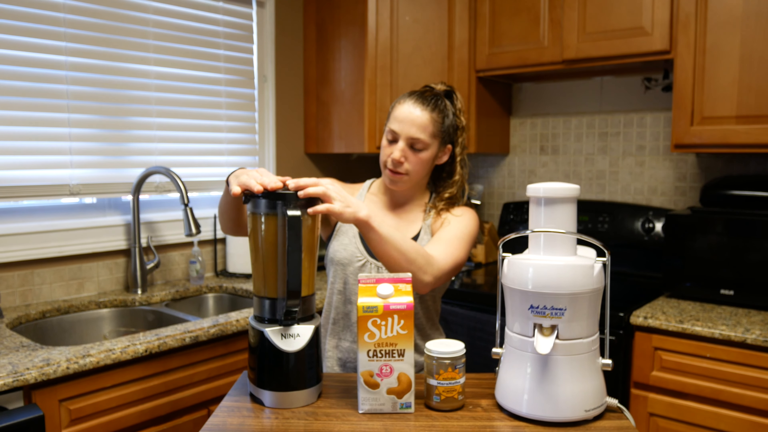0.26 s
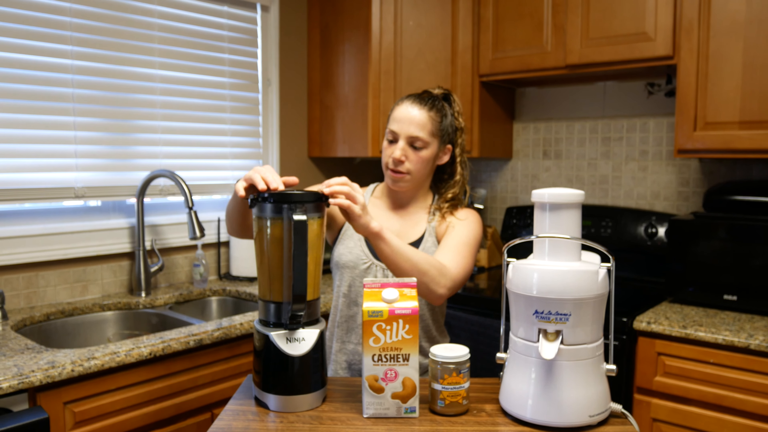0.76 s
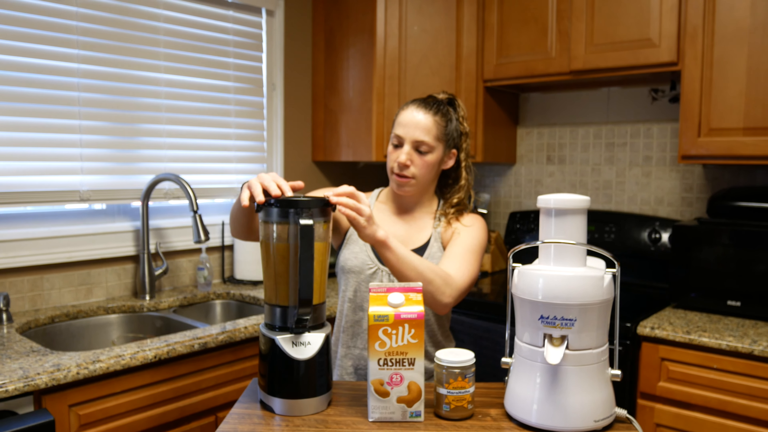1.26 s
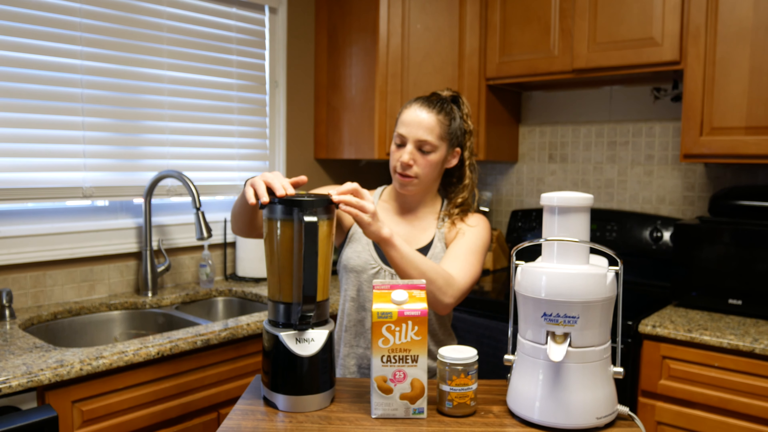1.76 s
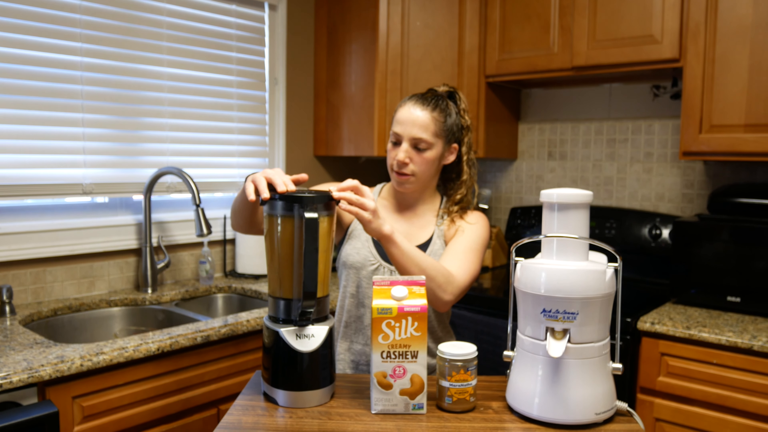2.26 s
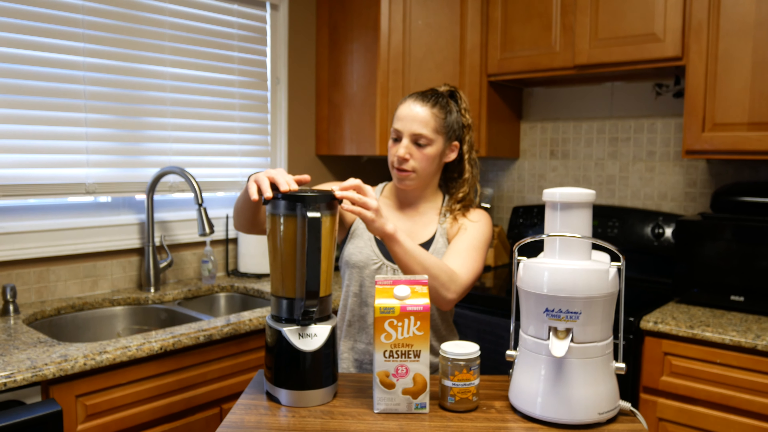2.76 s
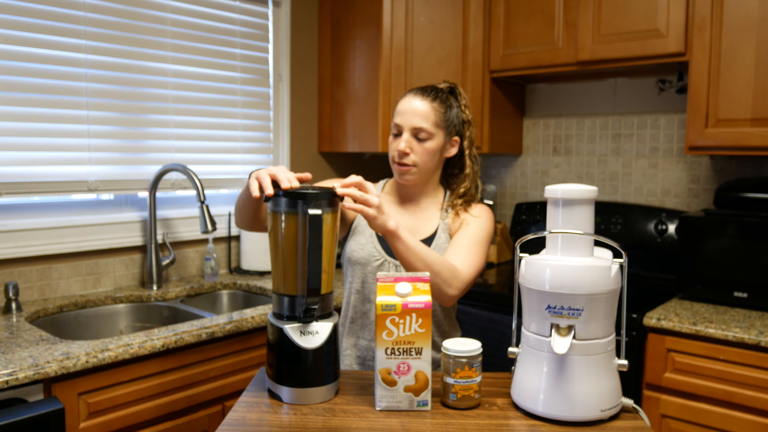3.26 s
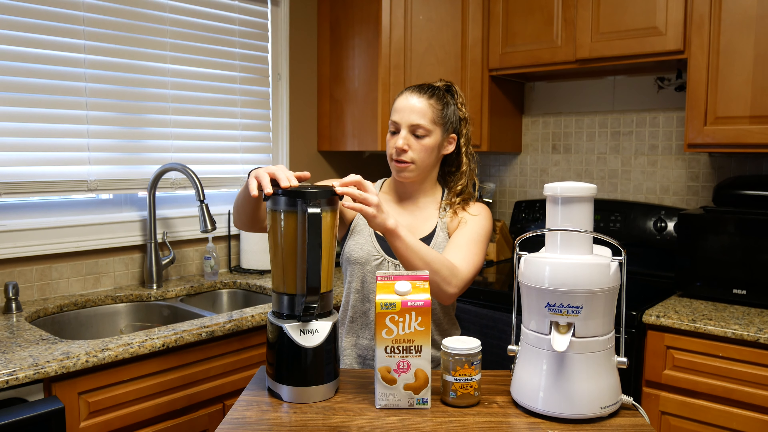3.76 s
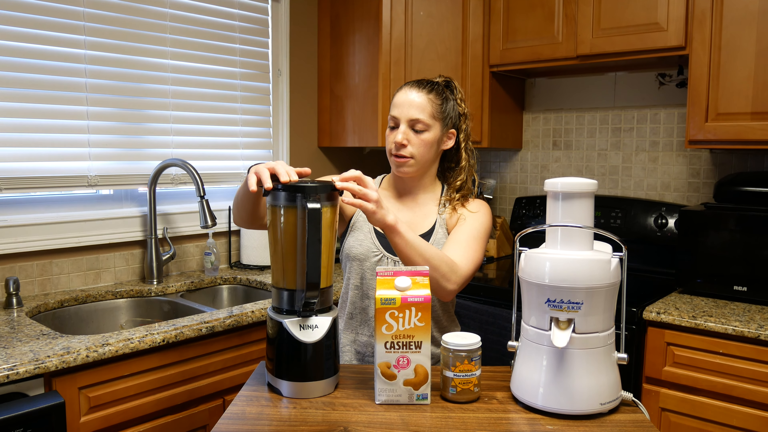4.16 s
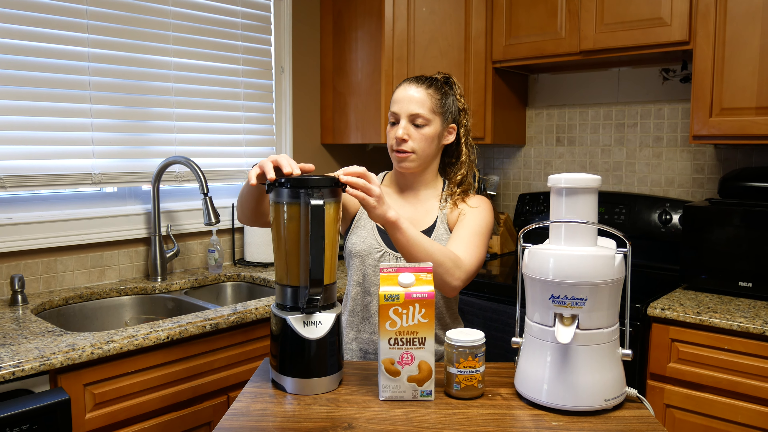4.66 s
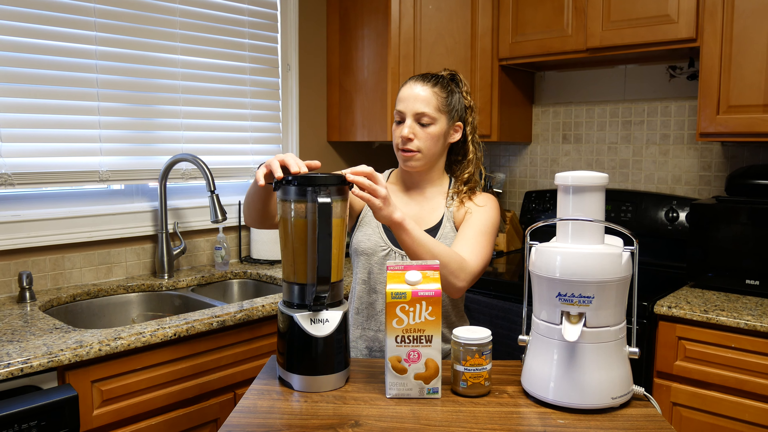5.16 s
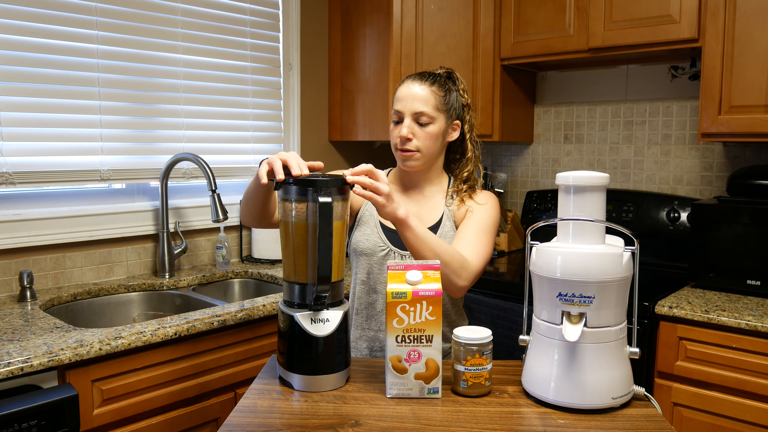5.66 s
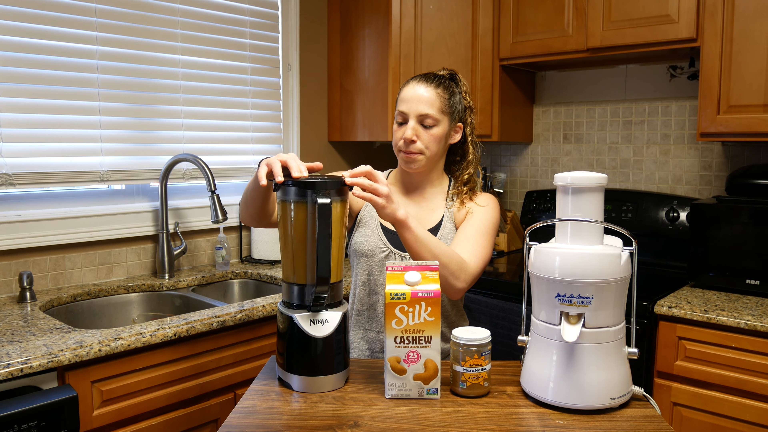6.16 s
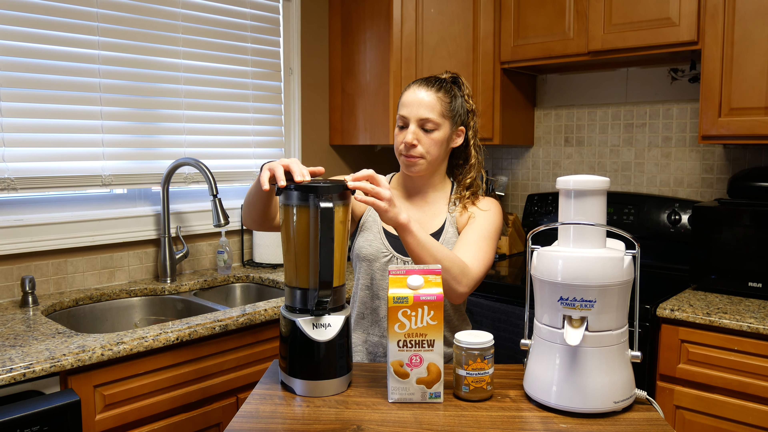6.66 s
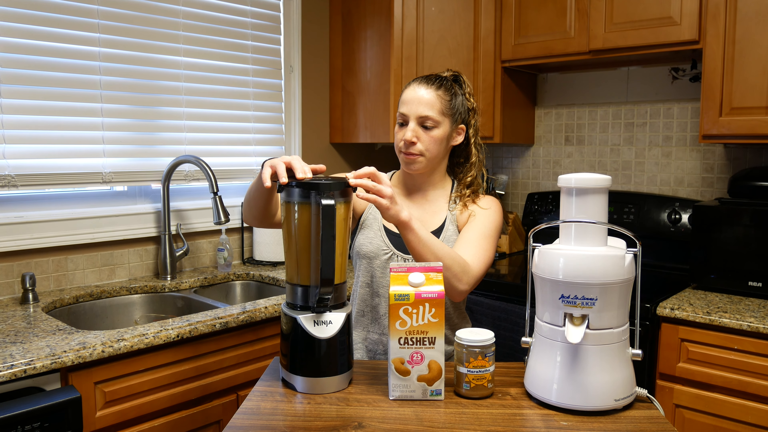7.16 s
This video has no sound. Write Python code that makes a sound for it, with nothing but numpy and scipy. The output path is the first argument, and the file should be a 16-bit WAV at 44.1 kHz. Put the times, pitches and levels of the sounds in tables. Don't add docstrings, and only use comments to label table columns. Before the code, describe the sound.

A blender, already running, whines hard close by, then cuts off and coasts down with sharp ice knocks and a crack. Lumps plop dully in a brief pause. It bites again with a bang and a rising whine, runs about three seconds, winds down, settles, then restarts and runs to the end. Close stereo microphone in a small kitchen with short echo.

```python
import sys
import numpy as np
from scipy import signal
from scipy.io import wavfile
from scipy.ndimage import uniform_filter1d

SR = 44100
rng = np.random.default_rng(int(sys.argv[2]) if len(sys.argv) > 2 else 0)


def store_pcm(level_fs):
    pcm = np.round(np.clip(level_fs, -1, 1) * 32767).astype(np.int16)
    wavfile.write(sys.argv[1], SR, np.atleast_2d(pcm).T)


def gain_from_decibels(decibels):
    exponent = np.asarray(decibels, float) / 20
    return 10 ** exponent


N = 327663
T = np.arange(N) / SR
HZ = np.fft.rfftfreq(N, 1 / SR)

STALL_HZ = 700
ATTACK_S = 0.03

# (on [s], off [s], mix slumps [s], liveliness of the settling mix [dB])
PRESSES = [
    (-.8, .39, .975, 5.5),
    (1.622, 4.305, 4.925, -1.),
    (5.908, 8., 9., .5),
]
# (time [s], tooth meshing [Hz], whine level [dB])
SPEEDS = [
    [(0, 2322, -34.5), (.12, 2335, -33), (.39, 2349, -31)],
    [(1.63, 1460, -47), (1.95, 2042, -40), (2.1, 2146, -42), (2.24, 2270, -32.5), (2.42, 2290, -32),
     (2.55, 2330, -33), (2.8, 2321, -33), (3.2, 2346, -32.5), (4.305, 2374, -31.5)],
    [(5.92, 1433, -48), (6.05, 1784, -38), (6.2, 2090, -42), (6.35, 2146, -41), (6.5, 2264, -40),
     (6.66, 2322, -35), (6.85, 2341, -31.5), (7.1, 2337, -30.5), (7.43, 2352, -31)],
]


def gearing():
    coast_hz_per_s, whine_db_per_octave = 3400, 7.0
    unloaded_db = -5.0
    mesh_hz, whine_db = np.full(N, STALL_HZ, float), np.zeros(N)
    for (on, off, *_), table in zip(PRESSES, SPEEDS):
        s, hz, db = np.transpose(table)
        powered = np.interp(T, s, hz)
        now = np.maximum(powered - coast_hz_per_s * np.maximum(T - off, 0), STALL_HZ)
        mesh_hz = np.where(T >= on + ATTACK_S / 2, now, mesh_hz)
        slowed_db = whine_db_per_octave * np.log2(now / powered)
        level = np.interp(T, s, db) + slowed_db + unloaded_db * (T > off)
        whine_db = np.where(T >= on, level, whine_db)
    whine_db = uniform_filter1d(np.where(mesh_hz > STALL_HZ, whine_db, -90), size=800)
    past = np.maximum(mesh_hz - 2350, 0) / 6.0
    neighbour_db = whine_db - 2.5 - past ** 2
    return mesh_hz, whine_db, neighbour_db


# (multiple of the blade shaft, level re whine [dB])
ORDER_LINES = [(32, -9), (39, -9.5), (44, -6.5), (45, -13.5), (52, -10), (53, -4), (57, -4.5), (60, -9),
               (96, -11.5), (97, -8.5), (101, -11.5), (141, -13), (146, -11.5)]
# (multiple of meshing, width [Hz], level [dB])
ROAR = [(.98, 650, -1.5), (1.19, 550, -4.5), (2.02, 400, -4.5), (2.99, 650, -6)]
# (pitch [Hz], width [Hz], level [dB])
HOUSING = (2450, 900, -2)


def gears(roar_db, mesh_hz, whine_db, neighbour_db):
    teeth = 48
    glide_hz_per_s = uniform_filter1d(abs(np.gradient(mesh_hz)) * SR, size=3000)
    slip = np.clip(glide_hz_per_s / 1500, 0, 1)
    turns = np.cumsum(mesh_hz * (1 + 0.0008 * drift(20))) / SR / teeth

    # (multiple, level dB, waver dB, phase wander rad)
    levels = [(teeth, whine_db + 1, 1.5, 0.25), (teeth + 1, neighbour_db, 1.5, 0.25)]
    for k, db in ORDER_LINES:
        levels.append((k, whine_db + db - 12 * slip, 2.5, 1.5 * (k / teeth) ** 2))
    lines = np.zeros((2, N))
    for k, db, waver_db, wander in levels:
        phase = 2 * np.pi * (np.round(k) * turns + rng.random()) + wander * drift(25)
        phase = phase + [[0], [0.22 * rng.standard_normal()]]
        lines += np.sqrt(2) * gain_from_decibels(db - 4.0 * slip + waver_db * drift(12)) * np.cos(phase)

    smear = evened(resonate(pair(1), mesh_hz, 160))
    smear = smear + 0.55 * evened(resonate(pair(1), 1.3 * mesh_hz, 130))
    blur = slip * gain_from_decibels(whine_db + 8.0 + 2.5 * drift(30)) * smear

    once_a_turn = 1 + 0.081 * np.cos(2 * np.pi * turns)
    rattle = pair(chips(per_s=300.0, spread_db=1.0, decay_s=0.001) * once_a_turn)
    roar = np.zeros((2, N))
    for k, width, db in ROAR:
        band = resonate(resonate(rattle, k * mesh_hz, width), k * mesh_hz, width)
        roar += gain_from_decibels(db - 2.1 * k * slip) * evened(band)
    hz, width, db = HOUSING
    case = gain_from_decibels(db) * evened(resonate(resonate(rattle[:, ::-1], hz, width), hz, width))
    speed = mesh_hz / mesh_hz.max()
    rough = evened(roar) * speed + case * (1 - speed) ** 2
    return lines + blur + gain_from_decibels(roar_db - 4.5) * rough


# (pitch [Hz], width [Hz], level [dB])
JAR = [(444, 54, -10), (820, 360, -6), (1172, 85, -6.5), (1750, 150, -1), (2650, 300, -4), (2960, 710, 0),
       (4550, 380, 7)]
# (frequency [Hz], level per Hz [dB])
CHURN = [(120, -53), (200, -6), (400, -4.5), (750, 1), (1150, -2.5), (1450, -2.5), (2200, -9), (3500, -2.5),
         (7000, -30.5)]
HISS = [(800, -54), (2000, 5), (3500, -3.5), (5000, -3), (6300, -5), (8300, -7.5), (10000, -6),
        (12500, -11.5), (14500, -18), (16000, -35)]
SPRAY = [(5000, -30), (9000, -0.5), (12000, -4), (14500, -10), (16000, -6)]
# (time [s], level re hiss [dB])
SPLASHES = [(.2, -14), (2.05, -8), (2.54, -5), (2.83, -2), (3.35, -8), (3.64, -7), (3.9, -12), (4.85, -3),
            (6.22, -7), (6.285, -16), (6.425, -11), (6.945, -6), (7.31, -11)]


def mix_in_jar(churn_db, hiss_db):
    flow = pair(chips(per_s=130.0, spread_db=1.0, decay_s=0.0022))
    body = sum(gain_from_decibels(db) * evened(resonate(flow, hz, width)) for hz, width, db in JAR[:4])
    churn = colour(flow, CHURN) + 0.35 * evened(body)
    calm = np.clip((-44 - churn_db) / 8, 0, 0.7)
    dull = signal.lfilter(*signal.butter(2, 1300, fs=SR), churn)
    churn = churn + calm * (dull - churn)

    chipping = chips(per_s=250.0, spread_db=1.5, decay_s=0.0012) * gain_from_decibels(0.66 * drift(17))
    hiss = colour(pair(chipping), HISS)
    splash = gain_from_decibels(-13.5 + 1.4 * drift(13))
    for s, db in SPLASHES:
        splash = splash + gain_from_decibels(db) * np.exp(-((T - s) / 0.016) ** 2)
    fizz = hiss + splash * colour(pair(1), SPRAY)
    slow = np.clip((-26.5 - hiss_db) / 40, 0, 0.22)
    dull = signal.lfilter(*signal.butter(2, 6500, fs=SR), fizz)
    fizz = fizz + slow * (dull - fizz)
    return gain_from_decibels(churn_db + 2.27) * evened(churn) + gain_from_decibels(hiss_db + 1.28) * fizz


# (pitch [Hz], width [Hz], level [dB])
DRONE = [(246.4, 11, -4.5), (278.5, 19.7, 4.5), (328, 40, -12)]


def base(drone_db):
    shake = pair(gain_from_decibels(0.5 * drift(40)))
    ring = sum(gain_from_decibels(db) * evened(resonate(shake, hz, width)) for hz, width, db in DRONE)
    ring = colour(ring, [(150, -44), (220, -1.5), (350, -1), (600, -24)])
    rumble = colour(pair(1), [(25, -30), (60, -16), (75, -3), (120, -20), (170, 9), (240, -20)])
    return gain_from_decibels(drone_db - 2.0) * (ring + gain_from_decibels(-18.0) * rumble)


# running level [dB], extra load at the bite [dB],
# coasting [dB/s]
RUN_DB = [-31.5, -25.1, -33., -27.]
BITE_DB = [9.2, 2.5, 3., -3.]
COAST_DB_PER_S = [-9.5, -23., -21., -3.]
# settling level [dB], its fade [dB/s], share of the liveliness [ratio]
SETTLE_DB = [-46., -48.7, -54., -70.]
SETTLE_DB_PER_S = [-14., -26., -2.5, -1.5]
SETTLE_SHARE = [.3, 1., .1, .1]
# share of the surges [ratio], random flicker [dB]
SURGE_SHARE = [.4, 1.1, .15, .2]
FLICKER_DB = [1.3, .5, 1.5, 2.6]
# (time [s], level [dB], length [s])
SURGES = [(.19, 2.5, .05), (.455, 3.5, .03), (.615, 4, .035), (.704, 8.5, .04), (.8, 2.5, .04),
          (.865, 4, .04), (.945, 6, .06), (1.485, 7, .035), (1.66, 1.5, .03), (1.72, 2.5, .025),
          (1.82, 2.5, .03), (1.96, 1.5, .1), (4.48, 2.5, .05), (4.69, 6.5, .055), (4.855, 11, .045),
          (4.95, 4.5, .06), (5.25, 2.5, .08), (5.43, 9.5, .08), (5.68, 2, .05), (6.1, 1, .08),
          (6.3, 1.5, .05), (6.48, 2.5, .06), (6.95, 1.2, .1)]


def effort():
    bite_s, slump_db_per_s, flicker_hz = 0.14, 150.0, 18.0
    surge_rise = 0.4
    columns = (RUN_DB, BITE_DB, COAST_DB_PER_S, SETTLE_DB, SETTLE_DB_PER_S, SETTLE_SHARE,
               SURGE_SHARE, FLICKER_DB)
    run, bite, coast, settle, fade, lively, share, flicker = (np.array(v)[:, None] for v in columns)
    level = settle + 0 * T
    for on, off, slump, lively_db in PRESSES:
        moving = run + bite * np.exp(-abs(T - on) / bite_s) + coast * (np.clip(T, off, slump) - off)
        after = np.maximum(T - slump, 0)
        settling = settle + lively * lively_db + fade * after
        new = 20 * np.log10(gain_from_decibels(moving - slump_db_per_s * after) + gain_from_decibels(settling))
        level = level + np.clip((T - on) / ATTACK_S, 0, 1) * (new - level)
    surge = np.zeros(N)
    for s, db, length in SURGES:
        side = np.where(T < s, surge_rise * length, length)
        surge += db * np.exp(-((T - s) / side) ** 2)
    return level + share * surge + flicker * np.array([drift(flicker_hz) for _ in RUN_DB])


# (time [s], peak [dB], pitch [Hz], low part [dB], high part [dB])
KNOCKS = [(0.454, -8.5, 2020, -1, -19), (0.62, -10, 630, -7, -17), (0.695, -16, 2650, -26, -24),
          (0.704, -1.5, 2630, -24, -27), (0.805, -10, 2310, -23, -8.5), (0.859, -9, 450, -8, -11),
          (0.93, -9, 1140, -11, -17), (1.641, -8, 624, -17, -25), (1.66, -1.5, 2420, -10, -23),
          (1.71, -5, 2560, -5, -9), (1.729, -7, 1710, -17, -13), (4.677, -10.5, 910, -9, -20),
          (4.843, -18, 2400, -14, -4), (4.861, -16, 2700, -11, -22), (5.924, -13, 433, -21, -27),
          (5.934, -5.5, 767, -20, -28), (6.019, -2, 2140, -24, -22), (6.048, -4, 1850, -14, -20)]


def knocks():
    out, t = np.zeros(N), np.arange(4000) / SR
    for s, db, hz, low_db, high_db in KNOCKS:
        puff = rng.standard_normal((3, len(t)))
        low = signal.lfilter(*signal.butter(2, [300, 1500], "band", fs=SR), puff[0])
        high = signal.lfilter(*signal.butter(2, 5000, "high", fs=SR), puff[1])
        ring = np.zeros(len(t))
        for (f, width, d), phase in zip([(hz, 45, 3.0)] + JAR[3:], puff[2]):
            ring += gain_from_decibels(d) * np.exp(-np.pi * width * t) * np.sin(2 * np.pi * f * t + phase)
        thud = gain_from_decibels(low_db) * evened(low) * np.exp(-t / 0.025) * 0.37
        splinters = gain_from_decibels(high_db) * evened(high) * np.exp(-t / 0.007) * 0.82
        onset = np.minimum(t / 0.00024, 1)
        add(out, s, gain_from_decibels(db - 3.0) * (0.24 * ring + thud + splinters) * onset)
    return out


# (time [s], peak [dB])
CRACKS = [
    (.6985, -4),
    (.7053, -8),
    (1.6625, -11),
    (4.8615, -9),
    (5.551, -40),
    (5.913, -36),
]


def cracks():
    out, t = np.zeros(N), np.arange(4000) / SR
    tick = np.exp(-t / 0.0005) * np.sin(2 * np.pi * 2900 * t)
    for s, db in CRACKS:
        add(out, s, gain_from_decibels(db + 2) * tick)
    return out


# (time [s], peak [dB])
CLACKS = [
    (.004, -17),
    (4.285, -14),
    (4.293, -14),
    (4.308, -18),
]
# (pitch [Hz], level [dB], t60 [s])
LATCH = [(1125, 1, .11), (1250, 0, .1), (1820, -2, .05), (2627, -1, .04)]


def latch():
    out, t = np.zeros(N), np.arange(4000) / SR
    clack = sum(gain_from_decibels(db - 60 * t / t60) * np.sin(2 * np.pi * hz * t) for hz, db, t60 in LATCH)
    for s, db in CLACKS:
        add(out, s, gain_from_decibels(db - 9) * clack)
    return out


# (time [s], low ring [Hz], high ring [Hz], low level [dB], high level [dB])
SETTLES = [(1.119, 509, 3560, -44.5, -38.5), (1.223, 649, 1320, -45, -58), (1.259, 450, 2670, -34, -46),
           (1.308, 285, 2010, -37.5, -45), (1.38, 275, 1890, -35.5, -42.5), (1.479, 336, 1830, -42, -56),
           (1.6, 270, 10600, -55, -53), (5.129, 275, 1320, -41, -50), (5.204, 487, 2200, -42, -56.5),
           (5.284, 250, 2940, -54, -46.5), (5.371, 296, 1680, -32.5, -54), (5.397, 312, 1750, -41, -64),
           (5.429, 288, 1760, -53, -66), (5.489, 258, 1840, -55, -66), (5.552, 420, 3220, -49, -46),
           (5.617, 404, 2130, -43, -48), (5.852, 306, 10700, -64, -51.5)]


def settles():
    out, t = np.zeros(N), np.arange(5000) / SR
    for s, low_hz, high_hz, low_db, high_db in SETTLES:
        grit = rng.standard_normal(len(t))
        ring = signal.lfilter(*signal.iirpeak(low_hz, 4.0, fs=SR), grit)
        body = signal.lfilter(*signal.butter(3, [400, 1700], "band", fs=SR), grit)
        low = (evened(ring) + 0.56 * evened(body)) * np.exp(-t / 0.028) * np.minimum(t / 0.002, 1)
        high = signal.lfilter(*signal.iirpeak(high_hz, 1.8, fs=SR), grit)
        high = signal.lfilter(*signal.iirpeak(high_hz, 2.5, fs=SR), high)
        high = evened(high) * np.exp(-t / 0.019)
        add(out, s, gain_from_decibels(-2.5) * (gain_from_decibels(low_db) * low + gain_from_decibels(high_db) * high))
    return out


# (time [s], peak [dB], pitch [Hz])
THUMPS = [
    (5.932, -15, 435),
    (1.648, -20, 435),
    (5.374, -34, 300),
]


def thumps():
    out, t = np.zeros(N), np.arange(5000) / SR
    for s, db, hz in THUMPS:
        add(out, s, gain_from_decibels(db - 60 * t / 0.098) * np.sin(2 * np.pi * hz * t))
    return out


# (frequency [Hz], t60 [s])
KITCHEN = [(200, 0.25), (1000, 0.31), (4000, .35), (12000, 0.27)]


def kitchen(x):
    taps = np.zeros((2, SR // 2))
    jitter = rng.integers(0, 20, (2, (SR // 2 - 201) // 20))
    at = np.arange(200, SR // 2 - 20, 20) + jitter
    np.put_along_axis(taps, at, rng.choice([-1., 1.], at.shape), 1)
    hz, t, z = signal.stft(taps, SR, nperseg=256)
    decay = gain_from_decibels(-60 * t / read(KITCHEN, hz)[:, None])
    tail = signal.istft(z * decay, SR, nperseg=256)[1]
    return signal.fftconvolve(x[None], tail / np.linalg.norm(tail[0]), axes=1)[:, :N]


# (frequency [Hz], level [dB])
ROOM_TONE = [(15, -59), (25, -53), (53, -12), (305, 4.5), (359, -2), (469, 2), (631, -7), (1200, -14),
             (1380, -29), (1620, -26), (2060, -28.5), (10100, -26), (15500, -56)]
# (pitch [Hz], rms level [dB])
HUM = [(75, -69.5), (119, -68)]


def quiet_kitchen():
    hum = sum(gain_from_decibels(db + 3) * np.sin(2 * np.pi * hz * T + 0.5 * drift(6)) for hz, db in HUM)
    return gain_from_decibels(-53) * colour(pair(1), ROOM_TONE) + hum


# (frequency [Hz], left-right likeness [ratio])
SAME = [(60, 0.24), (130, 0.8), (290, 0.97), (640, 0.81), (1410, 0.82), (3100, 0.79), (6820, 0.69),
        (15000, 0.49)]
# (frequency [Hz], left over right [dB])
LEAN = [(60, -1.7), (130, -0.5), (290, -1.2), (640, -2.7), (1410, -1.4), (3100, 0.47), (6820, -0.091),
        (15000, -1.8)]


def pair(shape):
    a, b = np.fft.rfft(shape * rng.standard_normal((2, N)))
    same, lean = np.clip(read(SAME, HZ), 0, 1), gain_from_decibels(read(LEAN, HZ) / 2)
    right = same * a + np.sqrt(1 - same ** 2) * b
    return np.fft.irfft([a * lean, right / lean], N)


def chips(per_s, spread_db, decay_s):
    struck = rng.random(N) < per_s / SR
    size = gain_from_decibels(spread_db * np.minimum(rng.exponential(1, N), 4)) * struck
    fall = np.exp(-1 / (decay_s * SR))
    return np.sqrt(1 + signal.lfilter([1], [1, -fall], size ** 2))


def resonate(x, hz, width):
    turn = np.exp(2j * np.pi * np.cumsum(hz * np.ones(N)) / SR)
    r = np.exp(-np.pi * width / SR)
    return 2 * (turn * signal.lfilter([1 - r], [1, -r], x / turn)).real


def colour(x, points):
    return evened(np.fft.irfft(np.fft.rfft(x) * gain_from_decibels(read(points, HZ)), N))


def drift(hz):
    knots = rng.standard_normal(2000)
    return np.interp(T * hz, np.arange(len(knots)), knots)


def evened(x):
    return x / np.sqrt(np.mean(x ** 2) + 1e-20)


def read(points, hz):
    f, value = np.transpose(points)
    return np.interp(np.log(hz + 1), np.log(f + 1), value)


def add(mix, s, sound):
    part = mix[round(s * SR):][:len(sound)]
    part += sound[:len(part)]


def scene():
    churn_db, hiss_db, drone_db, roar_db = effort()
    blender = gears(roar_db, *gearing()) + mix_in_jar(churn_db, hiss_db) + base(drone_db)
    blows = knocks() + cracks() + latch() + settles() + thumps()
    blows = signal.lfilter(*signal.butter(2, 180, "high", fs=SR), blows)
    direct = blows * gain_from_decibels([[-0.4], [0.4]])
    return blender + direct + gain_from_decibels(-5.5) * kitchen(blows) + quiet_kitchen()


def roll_off(x):
    return signal.sosfilt(signal.butter(12, 15640, fs=SR, output="sos"), x)


def record(dry):
    notch = 1 - gain_from_decibels(-0.4) * np.exp(-((HZ - 7850) / 70) ** 4)
    low_cut = 1 / np.sqrt(1 + (65 / (HZ + 1)) ** 4)
    top = 1 / np.sqrt(1 + (HZ / 15250) ** 80)
    mix = np.fft.irfft(np.fft.rfft(dry) * notch * low_cut * top, N)
    return roll_off(mix)


dry = scene()
out = record(dry)
store_pcm(out)
```